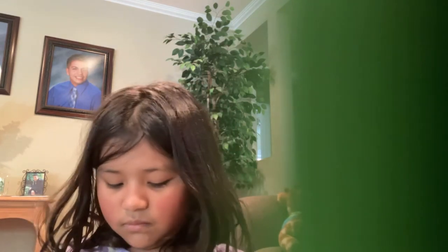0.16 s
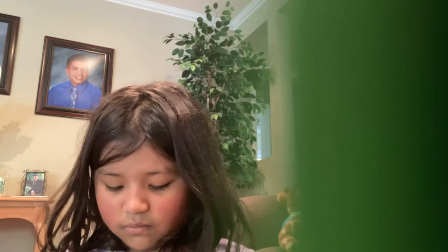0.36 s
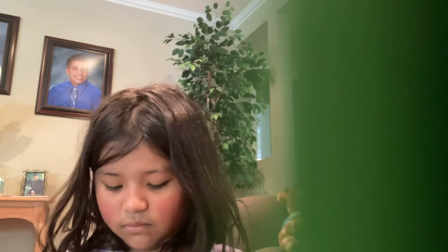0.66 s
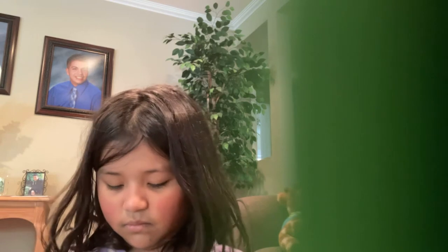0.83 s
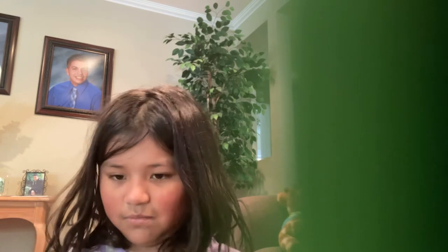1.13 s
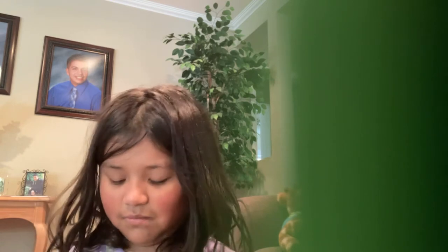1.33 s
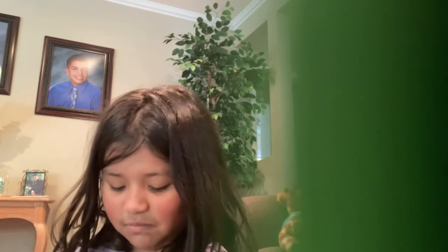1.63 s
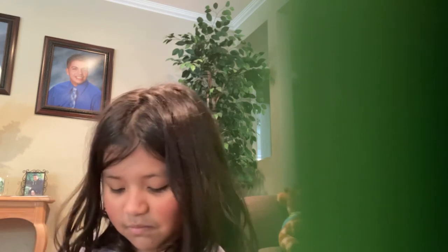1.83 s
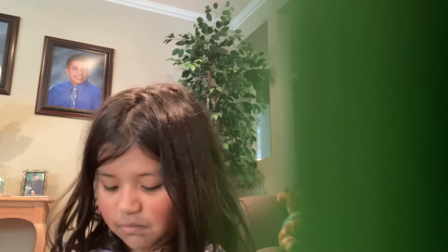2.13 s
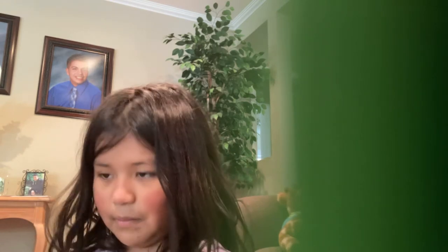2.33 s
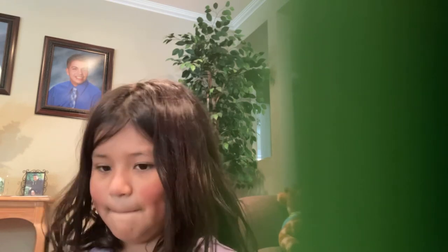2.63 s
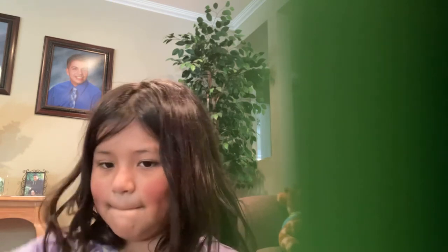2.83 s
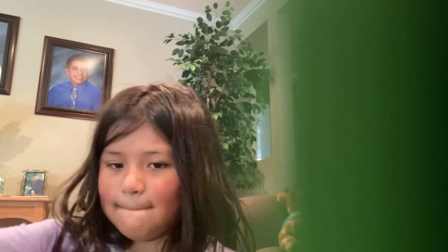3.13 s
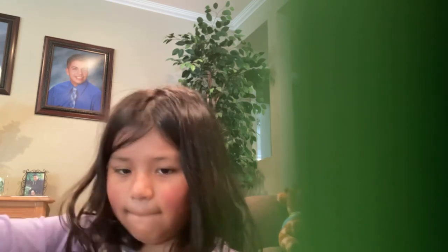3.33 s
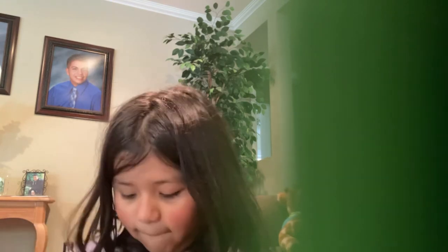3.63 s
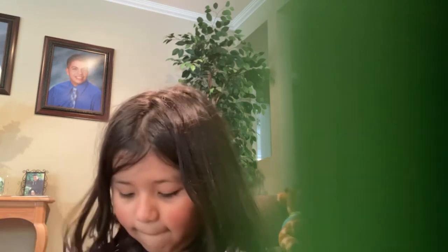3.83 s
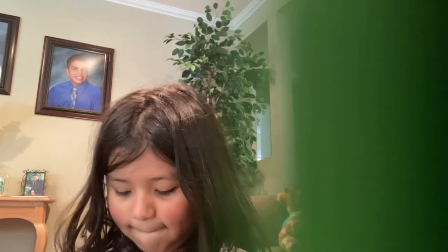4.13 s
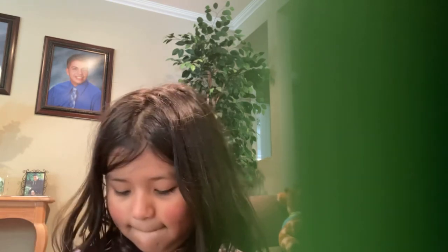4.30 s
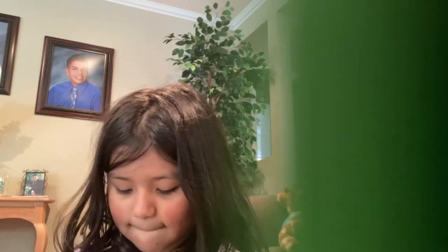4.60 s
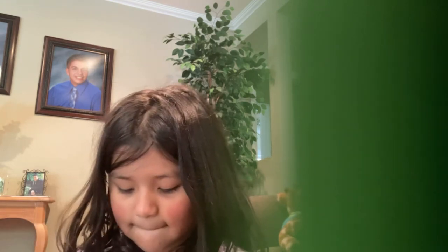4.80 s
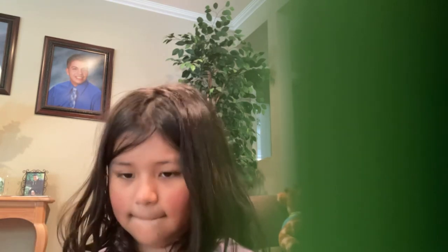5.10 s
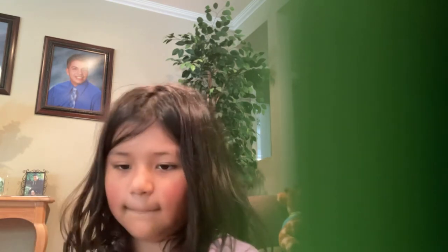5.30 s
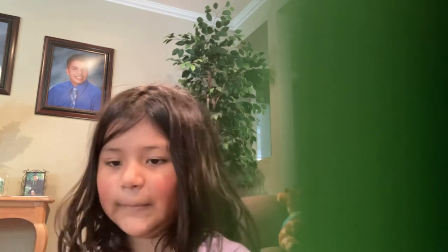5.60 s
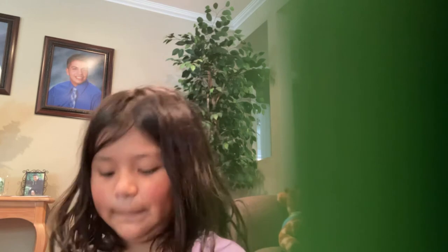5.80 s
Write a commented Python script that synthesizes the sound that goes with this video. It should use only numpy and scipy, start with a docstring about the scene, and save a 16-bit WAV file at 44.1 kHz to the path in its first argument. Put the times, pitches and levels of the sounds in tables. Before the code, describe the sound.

Tape cracks off a roll close to the microphone, paper crinkles, the roll bumps and drags across the tabletop, then soft rustling fades.

```python
"""Tape snapped off a roll at a table

Wide adhesive tape is snapped off a roll and pressed on paper, close to a laptop microphone.
Snaps are few-ms noise bursts in four bands, with a desk echo and a decaying-noise room response.
Rustle is dense random ticks and noise; bumps are short low bands of noise.
Knocks and the dragged roll excite resonances; faint hum and shaped noise run throughout."""
import sys
import numpy as np
from scipy import signal
from scipy.fft import rfft, irfft
from scipy.io import wavfile
from scipy.ndimage import uniform_filter1d

SR = 44100
rng = np.random.default_rng(int(sys.argv[2]) if len(sys.argv) > 2 else 0)


def generate_wav(sig):
    """Save sig (samples, or channels by samples) to the path in sys.argv[1] as 16-bit PCM at SR."""
    pcm = np.round(np.clip(np.atleast_2d(sig).T, -1, 1) * 32767).astype(np.int16)
    wavfile.write(sys.argv[1], SR, pcm)


N = 262395

# tape and paper crack spectrum, microphone colour included: freq_hz, density_db (per Hz)
CRACK_SPECTRUM = [(150, -41.5), (300, -6.5), (600, -16), (1300, -14.5), (2500, -13.5), (3600, -12.5),
                  (4600, -7), (6100, -12.5), (7200, -3), (8300, -3), (9300, -10.5), (10500, -14),
                  (13000, -21), (16000, -36)]
# treble, middle, low and top bands, in that order: low_edge_hz, high_edge_hz
BAND_EDGES = [(5500, 10500), (1600, 5500), (400, 1600), (10500, 17000)]


def undb(db):
    """Gain of a level in dB."""
    return 10 ** (np.asarray(db) / 20)


def unit(x):
    """Scaled to rms 1."""
    return x / np.sqrt(np.mean(x ** 2))


def colour(x, points):
    """Shapes the spectrum by (Hz, dB) points, interpolated over log frequency."""
    hz, db = np.transpose(points)
    f = np.maximum(np.fft.rfftfreq(len(x), 1 / SR), 1)
    gain = undb(np.interp(np.log(f), np.log(hz), db))
    return irfft(rfft(x) * gain, len(x))


def band(x, edges_hz):
    """Band-pass between two edges."""
    return signal.sosfilt(signal.butter(2, edges_hz, "bandpass", fs=SR, output="sos"), x)


def ring(x, modes):
    """Sum of resonances (Hz, width Hz, dB), at least 2 Hz wide; neighbours swing in opposite phase."""
    out = 0
    for k, (hz, width_hz, db) in enumerate(modes):
        b, a = signal.iirpeak(hz, hz / max(width_hz, 2.), fs=SR)
        out = out + (-1) ** k * undb(db) * signal.lfilter(b, a, x)
    return out


def add(out, start_s, x):
    """Mixes x in at a start time."""
    i = int(start_s * SR)
    out[i:i + len(x)] += x[:N - i]


def grains(per_s, spread_db):
    """Random ticks of very uneven size and random sign."""
    size = undb(spread_db * rng.exponential(size=N)) * rng.choice([-1, 1], N)
    return (rng.random(N) < per_s / SR) * size


def swell(peak_s, rise_s, hold_s, fall_s):
    """Gain that climbs to 1, holds and dies away, evenly in dB."""
    span_db = 30  # covered in one rise or fall time
    t = np.arange(N) / SR - peak_s
    before = -t / max(rise_s, .005)
    after = (t - hold_s) / max(fall_s, .01)
    return undb(-span_db * np.maximum(np.maximum(before, after), 0))


def floor():
    """Steady room and laptop noise with a few wavering tones, each narrowly filtered noise."""
    # background noise spectrum: freq_hz, density_db (per Hz)
    noise_spectrum = [(30, -27.5), (50, -27), (65, -8), (200, -7), (320, -11), (420, -8), (700, -15),
                      (1300, -24), (1700, -41.5), (3500, -35.5), (5500, -36), (8000, -27.5), (11000, -34.5),
                      (16000, -58)]
    # wavering tones: freq_hz, width_hz, level_db (rms)
    hum_tones = [(72.6, 8.3, -89), (120, 0.77, -76), (388.2, 4.3, -78)]
    noise_db = -69.5  # rms
    out = undb(noise_db) * unit(colour(rng.standard_normal(N), noise_spectrum))
    for hz, width_hz, db in hum_tones:
        out = out + undb(db) * unit(ring(rng.standard_normal(N), [(hz, width_hz, 0)]))
    return out


def rustle():
    """Dense fine crackle of paper and tape rubbed by moving fingers."""
    # finger movements: peak_s, rise_s, fall_s, treble_db; over the treble: middle_db, low_db
    rustle_events = [(0.03, 0.72, 0.16, -55, -6.5, -8.5), (0.33, 0.25, 0.24, -49, -5.5, -23),
                     (0.479, 0.14, 0.15, -54, -14, -12), (0.769, 0.051, 0.079, -69.5, 5.5, -12),
                     (0.93, 0.21, 0.12, -66.5, -12.5, -8.5), (1.085, 0.027, 0.066, -70.5, -15, -12),
                     (1.151, 0.052, 0.35, -69, -40, -40), (1.468, 0.38, 0.12, -89, 15.5, 25),
                     (1.532, 0.048, .05, -64.5, -8, -22), (1.84, 0.44, 0.11, -56.5, -7, -8.5),
                     (1.885, 0.046, 0.068, -60, -12, -37), (2.01, 0.11, .2, -63, -12, -11.5),
                     (2.42, .1, 0.45, -52, -17, -10.5), (2.755, 0.14, 0.25, -61, -6, -8),
                     (3.71, 0.047, 0.21, -61, -10.5, -6.5), (3.864, .03, 0.07, -64.5, -1.5, -3),
                     (4.16, 0.054, 0.15, -75, -3, -20), (4.3, 0.073, 0.031, -65, -6.5, -5.5),
                     (4.46, 0.12, 0.74, -55, -5, -6), (4.8, .1, 0.066, -61, -12, -11),
                     (5.15, 0.073, 0.079, -65.5, -18, -18), (5.194, 0.038, 0.16, -63, -0.5, -18.5),
                     (5.33, .05, 0.25, -70, -12, -25), (5.525, 0.05, 0.15, -74.5, 0.5, -14.5),
                     (5.62, 0.075, .3, -70, -0.5, -18), (5.83, 0.051, 0.046, -74, 2, -11),
                     (5.9, 0.03, .15, -73, 0, -15)]
    top_db = -14.5  # over the treble
    fine = colour(unit(grains(1500., 2.2)) + .8 * rng.standard_normal(N), CRACK_SPECTRUM)
    treble, middle, low, top = (unit(band(fine, edges)) for edges in BAND_EDGES)
    out = 0
    for peak_s, rise_s, fall_s, db, mid_db, low_db in rustle_events:
        mix = treble - undb(top_db) * top - undb(mid_db) * middle + undb(low_db) * low
        out = out + swell(peak_s, rise_s, 0, fall_s) * undb(db) * mix
    return out


def room(x):
    """Walls answer after a short gap with a dense tail; each third octave dies at its own rate."""
    # reverberation time: freq_hz, t60_s
    decay_times = [(200, 1), (600, 0.45), (1500, 0.51), (4000, 0.49), (9000, 0.4), (14000, 0.5)]
    # first strong wall answers: delay_s, level_db (over the tail)
    wall_answers = [(.0095, 10), (0.013, -4.5), (0.0183, 0), (0.023, -1)]
    gap_s, build_s, answer_width_s, room_db = .005, .007, .0019, -0.5
    # weaker second decay, its time a little shorter
    late_db, late_stretch = -20.5, 0.96
    t, tail = np.arange(SR * 3 // 4) / SR, 0
    hz, t60_s = np.transpose(decay_times)
    for f in 125 * 2 ** np.arange(0, 7.1, 1 / 3):
        part = band(rng.standard_normal(len(t)), (f / 2 ** (1 / 6), f * 2 ** (1 / 6)))
        fall = 1000. ** (-t / np.interp(np.log(f), np.log(hz), t60_s))
        tail = tail + part * (fall + undb(late_db) * fall ** (1 / late_stretch))
    tail = tail * (1 - np.exp(-np.maximum(t - gap_s, 0) / build_s))
    tail = tail * (1 + sum(undb(db) * np.exp(-((t - s) / answer_width_s) ** 2) for s, db in wall_answers))
    tail = tail / np.sqrt(np.sum(tail ** 2))
    return undb(room_db) * signal.fftconvolve(x, tail)[:N]


def snaps():
    """Glue lets go in a few ms; the desk throws it back; returns direct sound and room feed."""
    # tape and paper cracks: start_s, treble_db; over the treble: top_db, middle_db, low_db;
    # room feed over the crack: room_db
    snap_events = [(0.0574, -18, -1, -3.5, -13.5, -8.5), (0.2064, -15.5, -11.5, -8.5, -14.5, -9.5),
                   (0.4887, -46, -20, -10.5, -43, -4.5), (0.5634, -51.5, -10, -2, -13, -4),
                   (0.7485, -56.5, -25, -1, 0, 2.5), (1.1338, -54, -25, -33, -28.5, -21),
                   (1.5395, -22, 4.5, -1.5, -14.5, 0.5), (1.5434, -18.5, -4.5, -9.5, -16, 1),
                   (1.546, -18.5, -9, -6.5, -16.5, -6), (1.5486, -28, -7.5, -7.5, -14, -7.5),
                   (1.864, -43.5, -36, -10.5, -20, 0.5), (2.2494, -55.5, 0.5, -6, -37.5, 4.5),
                   (2.2941, -57, -20.5, -5.5, -4, 5), (2.341, -52.5, -18, -10, -12, 2.5),
                   (2.3801, -45, -8, -13, -32, 6), (2.3895, -40, -19, -13, -18, -5),
                   (2.455, -50, 1, -2, 0, 4), (2.498, -38.5, -1.5, -6, -8.5, -1),
                   (2.5116, -38.5, -35, -18, -13, -4), (2.7035, -55.5, -8, -12, -7.5, 3),
                   (2.7627, -43.5, 2, 1.5, 0.5, 3), (2.784, -52, 3, 4, 0, 3),
                   (2.8389, -46.5, -3, 1.5, -13, -2), (2.9026, -47, 6.5, 14.5, -4, -6.5),
                   (3.166, -49, -6.5, -2, 2.5, 6.5), (3.8461, -56.5, -2.5, -16.5, -3, 1.5),
                   (4.3085, -47.5, 0.5, -8, -1, 2.5), (4.388, -51.5, 2.5, -13, -3, 2),
                   (4.3987, -51, 6, -11, -10, -9), (4.4305, -41.5, 5, -0.5, -2.5, -1.5),
                   (4.5477, -28.5, -3, -2, -5.5, 0), (4.7681, -54, 0, -7, -4, -10),
                   (4.7897, -53.5, -14, -26.5, -30, -10.5), (5.1769, -49, -26.5, -8, -13.5, -2),
                   (5.4747, -61, -28.5, -16, -28, 0), (5.5928, -49, -30, -9.5, -10, 1),
                   (5.606, -59, -28, -2, -24, -14), (5.6727, -55, -32, -15, -21, -7.5),
                   (5.6885, -63, -24.5, -26, 0, 4.5), (5.6965, -60, -22, -11, -18, -5),
                   (5.7051, -50.5, -23, -3.5, -32, -8.5), (5.7812, -60, -10, -21, -11.5, 0.5),
                   (5.8063, -59, -28, -15, -28, 0.5), (5.8286, -63, -13, -13, -23, -11),
                   (5.8992, -51.5, -37, -12, -8, -4), (5.944, -61, -29, -16, -18, 5)]
    # a harder pull tightens the strip, which cracks higher: treble_db, low_ring_hz, fade_ms
    soft_db, soft_hz, soft_ms = (-48, 470, 1.4)
    hard_db, hard_hz, hard_ms = (-18, 1100, 1.6)
    # sign per band, so that neighbours join without a notch
    polarity = np.array([1, -1, 1, -1])
    echo_s, echo_db = .0029, -9.0  # desk
    level_s = .0045  # time over which a crack's level counts
    near, far, t = np.zeros(N), np.zeros(N), np.arange(4096) / SR
    echo = int(echo_s * SR)
    noise = colour(rng.standard_normal(N), CRACK_SPECTRUM)
    # delayed 64 samples to keep both sides of the symmetric pulse
    tick = np.roll(colour(1. * (t == 0), CRACK_SPECTRUM), 64)

    def coloured(x, gains, body_hz):
        """Four bands of x at their levels; the low one rings at the pitch of the free strip."""
        treble, middle, low, top = (band(x, edges) for edges in BAND_EDGES)
        low = 0.073 * low + ring(low, [(body_hz, 0.68 * body_hz, 0)])
        return sum(g * unit(p) for g, p in zip(gains, (treble, middle, low, top)))

    for start_s, db, top_db, mid_db, low_db, room_db in snap_events:
        body_hz = np.interp(db, (soft_db, hard_db), (soft_hz, hard_hz))
        fade_ms = np.interp(db, (soft_db, hard_db), (soft_ms, hard_ms))
        envelope = (1 - np.exp(-t / .0004)) * np.exp(-t * 1000 / fade_ms)
        burst = noise[int(start_s * SR) // 2:][:len(t)] * envelope
        band_db = db + np.array([0, mid_db, low_db, top_db])
        gains = polarity * np.sqrt(level_s / t[-1]) * undb(band_db)
        crack = coloured(burst, gains, body_hz)
        # the walls hear the crack from all sides, which evens out its colour
        add(far, start_s, undb(room_db) * (coloured(tick, gains, body_hz) + .25 * crack))
        crack[echo:] += undb(echo_db) * crack[:-echo]
        add(near, start_s, crack)
    return near, far


def bumps():
    """Soft, toneless low thuds through the table into the laptop: wide noise bands that die quickly."""
    # bumps: start_s, peak_db, centre_hz
    bump_events = [(.058, -42, 374), (0.207, -43, 260), (1.55, -53.5, 181), (2.925, -32.5, 235),
                   (2.958, -47.5, 82.7), (3.161, -39.5, 242.4), (3.373, -44, 265), (3.43, -47, 268),
                   (4.151, -60.5, 70), (4.269, -51, 535), (5.146, -55.5, 85), (5.18, -59.5, 74.2),
                   (5.323, -52, 229), (5.328, -51, 109), (5.385, -56, 170)]
    decay_cycles = 24  # to fall by 60 dB
    out, t = np.zeros(N), np.arange(SR // 2) / SR
    for start_s, peak_db, hz in bump_events:
        shape = (1 - np.exp(-t / .006)) * 1000. ** (-t * hz / decay_cycles)
        thud = shape * ring(rng.standard_normal(len(t)), [(hz, .3 * hz, 0)])
        add(out, start_s, undb(peak_db) * thud / np.abs(thud).max())
    return out


def walk(per_s):
    """Random levels, per_s a second, joined by straight slews; spread near 1."""
    k = int(SR / per_s)
    steps = np.repeat(rng.standard_normal(N // k + 1), k)
    return 1.23 * uniform_filter1d(steps, k)[:N]


def rubbed(slips, modes, wander_db):
    """Modes under a moving contact: the push on each one swells and fades on its own."""
    out = 0
    for k, mode in enumerate(modes):
        out = out + (-1) ** k * ring(slips * undb(wander_db * walk(30.)), [mode])
    return out


def table():
    """Stick-slip of the dragged roll rings table top and roll; single knocks ring the table top."""
    # drags: peak_s, rise_s, hold_s, fall_s, lower_db (table modes); over it: upper_db, roll_db, hiss_db
    drag_events = [(2.912, 0.012, 0.0074, 0.053, -35.5, -0.5, 3, -11.5),
                   (3.085, 0.011, 0.0084, 0.13, -44.5, -6.5, -18.5, -27.5),
                   (3.125, 0.021, .005, 0.14, -52.5, -6, -3.5, -11),
                   (3.163, 0.013, .03, 0.053, -50.5, 0, 4, -8.5),
                   (3.307, 0.051, 0.016, 0.07, -43.5, 3, 9.5, -10),
                   (3.326, 0.062, 0.042, 0.081, -27.5, -3.5, -11, -23.5),
                   (3.385, .06, 0.022, 0.053, -39, -6.5, -6, -5)]
    # knocks: start_s, peak_db, push_ms (four standard deviations of the push)
    knock_events = [(2.911, -27.5, 0.79), (3.082, -34, 1.12), (3.318, -24, 0.95), (5.32, -53.5, 1.43)]
    # table top modes: freq_hz, width_hz, level_db
    table_modes = [(261, 18, -13.5), (457.7, 13, -7.5), (526, 9.7, -4.5), (549.8, 20, -2), (659.6, 11, 0.5),
                   (715.5, 20, -6), (892, 86, -12.5), (1007, 16, -2), (1071, 22, -0.5), (1090, 110, -10),
                   (1199, 70, -8.5), (1339, 22, -11.5)]
    # roll modes: freq_hz, width_hz, level_db
    roll_modes = [(1830, 130, -1.5), (1938, 80, -5), (2230, 240, -3), (2494, 48, -4.5), (2820, 31, -1),
                  (2916, 6.7, -4), (3270, 300, -4), (3470, 54, -10), (4090, 290, -27), (4350, 76, -3),
                  (4570, 940, -9.5), (5660, 300, -8.5), (6080, 250, -25.5)]
    lead = .3  # upper modes and roll come early by this share of the rise
    hiss_spread = 1.2  # hiss rises and falls this much slower
    slips = unit(grains(600., 2.2)) + .4 * rng.standard_normal(N)
    # where the roll touches decides how the modes share the push
    lower = unit(band(rubbed(slips, table_modes[:6], wander_db=5.5), (230., 900.)))
    upper = unit(band(rubbed(slips, table_modes[6:], wander_db=3.5), (800., 1900.)))
    roll = unit(band(rubbed(slips, roll_modes, wander_db=3.5), (1200., 4500.)))
    hiss = unit(band(colour(slips, CRACK_SPECTRUM), (5000., 16000.)))
    out = np.zeros(N)
    for peak_s, rise_s, hold_s, fall_s, db, upper_db, roll_db, hiss_db in drag_events:
        main = swell(peak_s, rise_s, hold_s, fall_s)
        early = swell(peak_s - lead * rise_s, rise_s, hold_s + lead * rise_s, fall_s)
        wide = swell(peak_s, hiss_spread * rise_s, hold_s, hiss_spread * fall_s)
        bright = undb(upper_db) * upper + undb(roll_db) * roll
        out = out + undb(db) * (main * lower + early * bright + wide * undb(hiss_db) * hiss)
    t_ms = np.arange(8192) / SR * 1000
    for start_s, peak_db, push_ms in knock_events:
        push = np.exp(-.5 * ((t_ms - 2 * push_ms) / (push_ms / 4)) ** 2)
        knock = ring(push, table_modes)
        add(out, start_s, undb(peak_db) * knock / np.abs(knock).max())
    return out


def scene():
    """All sources, the room's answer to snaps, paper and table, and the floor."""
    near, far = snaps()
    paper, wood = rustle(), table()
    room_feed = far + undb(-9.5) * paper + undb(-10.5) * wood
    return (near + paper + wood + bumps() + room(room_feed) + floor())[None]


def record(dry):
    """The microphone drops the deep bass and rounds the loudest peaks; the recorder cuts the top."""
    low_cut_hz, top_hz = 55., 16300
    thin = signal.sosfilt(signal.butter(2, low_cut_hz, "highpass", fs=SR, output="sos"), dry)
    rounded = thin / (1 + thin ** 8) ** (1 / 8)
    return .9 * signal.sosfilt(signal.ellip(8, .2, 70, top_hz, fs=SR, output="sos"), rounded)


dry = scene()
out = record(dry)
generate_wav(out)
```